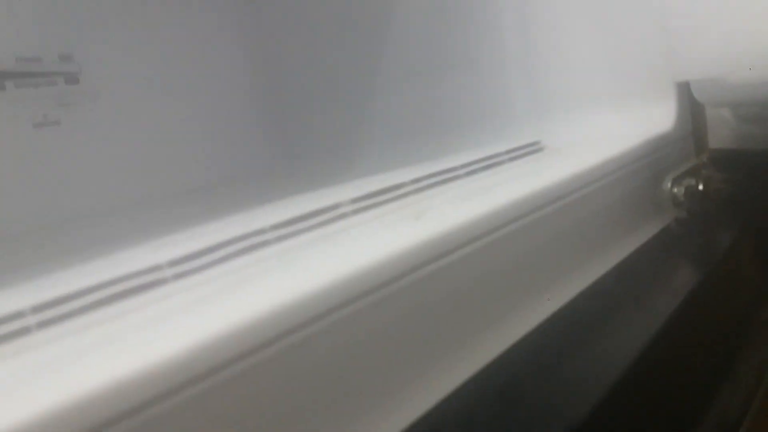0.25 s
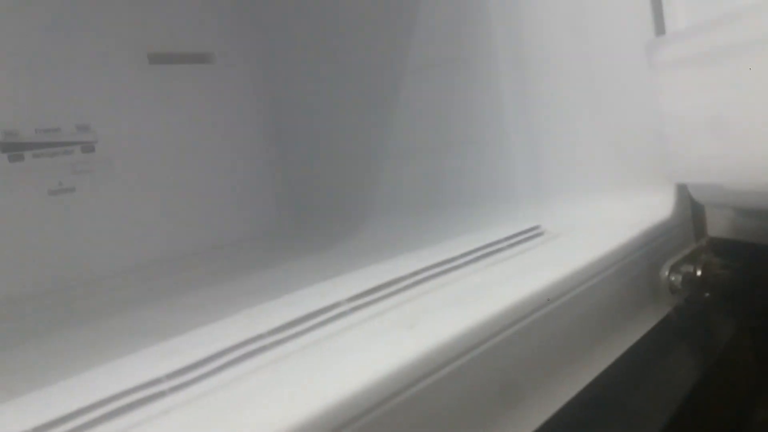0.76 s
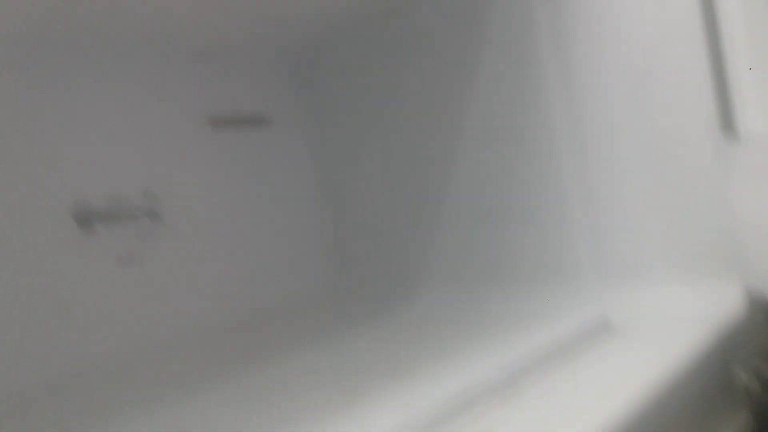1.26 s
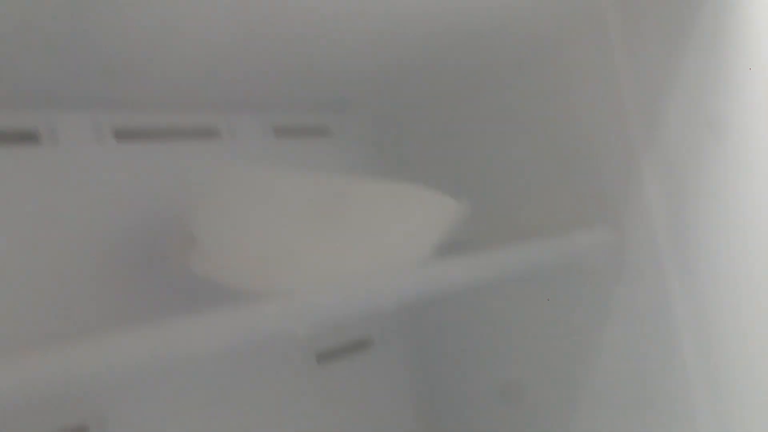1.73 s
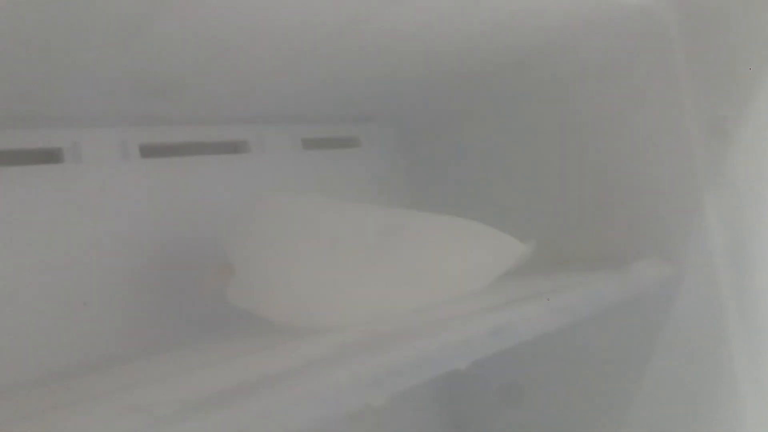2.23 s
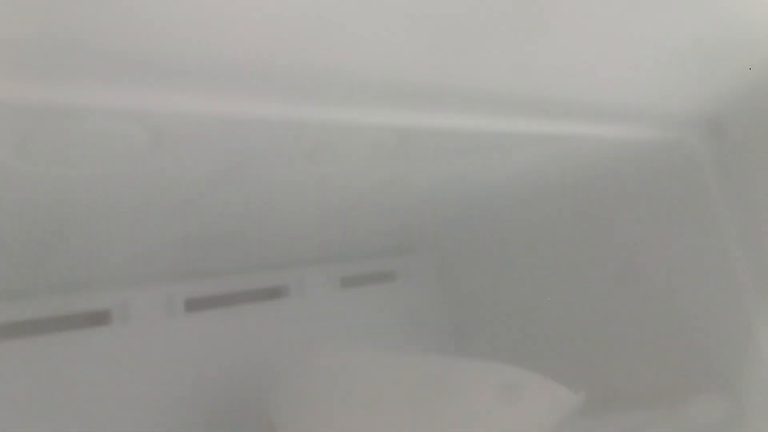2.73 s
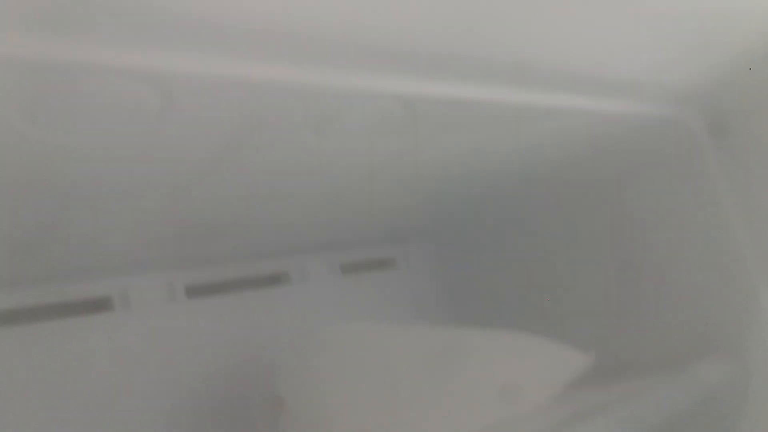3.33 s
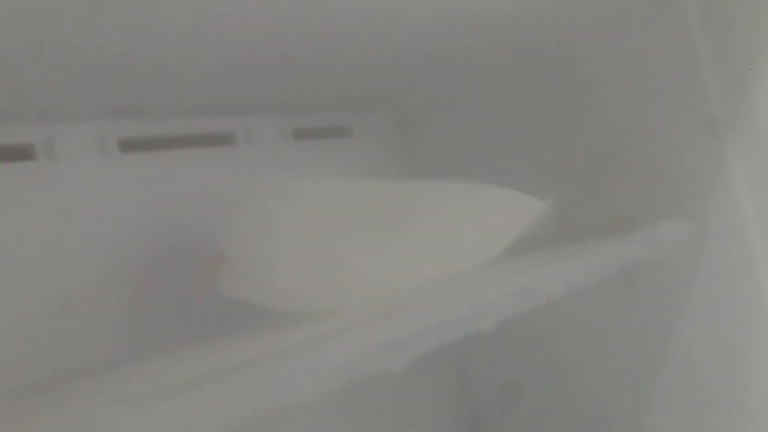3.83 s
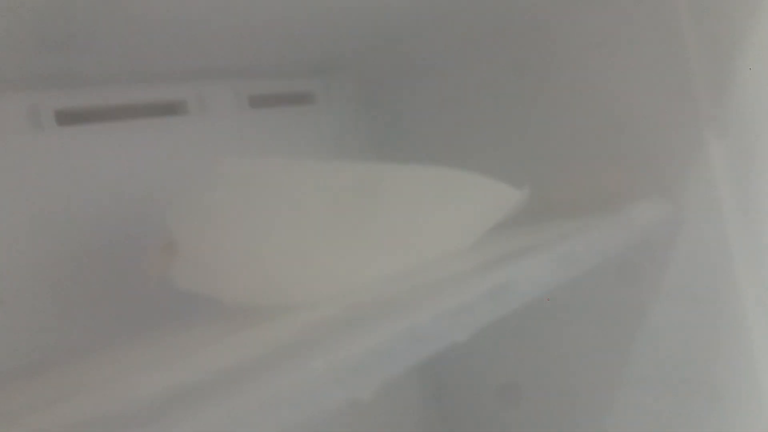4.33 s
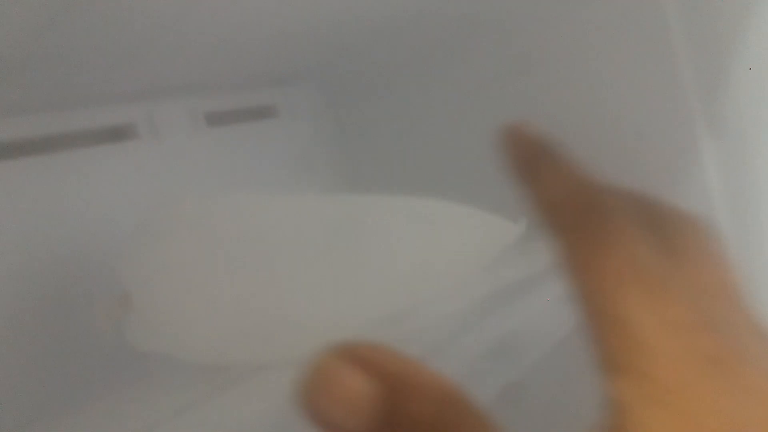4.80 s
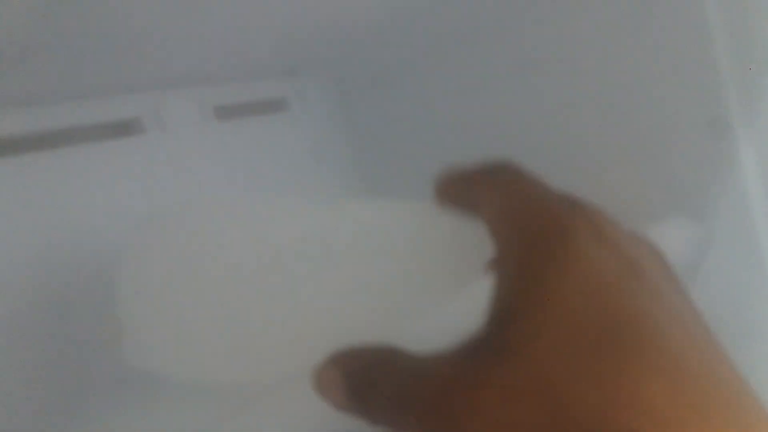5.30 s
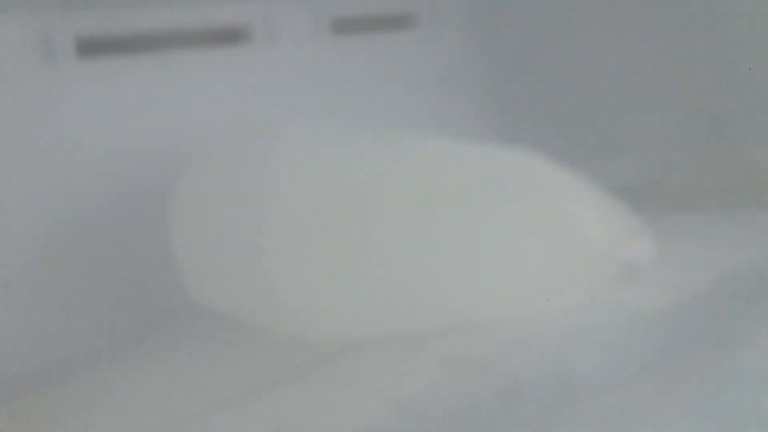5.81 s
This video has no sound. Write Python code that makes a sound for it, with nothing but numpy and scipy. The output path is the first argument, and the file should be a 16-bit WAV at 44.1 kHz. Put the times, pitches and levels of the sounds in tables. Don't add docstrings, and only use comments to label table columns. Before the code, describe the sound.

A steady fridge hum with airy rush and faint hiss, heard close from a moving hand-held microphone in a small hard-walled box. Fingers brush plastic quietly; one bright click with a small knock breaks in early. Rubbing grows scratchier midway, then a frozen plastic bag crackles and creaks as it is shoved, thudding hard against the shelf several times. Light ticks follow and the hum continues, its airy rumble growing stronger.

```python
import sys
import numpy as np
from scipy import signal
from scipy.fft import rfft, irfft, next_fast_len
from scipy.io import wavfile
from scipy.ndimage import uniform_filter1d

SR = 44100
rng = np.random.default_rng(int(sys.argv[2]) if len(sys.argv) > 2 else 0)


def bounce(signal):
    frames = np.transpose(np.atleast_2d(signal))
    limited = np.clip(frames, -1, 1)
    pcm = np.round(limited * 32767).astype(np.int16)
    wavfile.write(sys.argv[1], SR, pcm)


def amplitude_ratio(level_db):
    exponent = np.asarray(level_db, float) / 20
    return 10 ** exponent


N = 267113


def in_time(rows):
    s, *columns = np.transpose(rows)
    return [np.interp(np.arange(N) / SR, s, column) for column in columns]


def rms_one(x):
    return x / np.sqrt(np.mean(x ** 2) + 1e-20)


def coloured(spectrum):
    size = next_fast_len(N)
    hz = np.arange(size // 2 + 1) * SR / size + 1e-3
    at_hz, db = np.transpose(spectrum)
    gain = amplitude_ratio(np.interp(np.log(hz), np.log(at_hz), db, left=-120, right=-120))
    return rms_one(irfft(rfft(rng.standard_normal(size)) * gain, size)[:N])


def drift(rate_hz):
    r = np.exp(-80 * np.pi * rate_hz / SR)
    chance = rng.standard_normal(N // 40 + 2002)
    slow = signal.lfilter([1], [1, -2 * r, r * r], chance)[2000:]
    return np.interp(np.arange(N) / 40, np.arange(len(slow)), rms_one(slow - slow.mean()))


def band(x, low_hz, high_hz):
    return signal.sosfilt(signal.butter(3, [low_hz, high_hz], "band", fs=SR, output="sos"), x)


def ring(x, hz, t60_s):
    r, w = amplitude_ratio(-60 / (t60_s * SR)), 2 * np.pi * hz / SR
    return signal.lfilter([0, np.sin(w)], [1, -2 * r * np.cos(w), r * r], x + 1e-18)


def tone(hz, db, flutter_db):
    phase = 2 * np.pi * (np.cumsum(hz * np.ones(N)) / SR + rng.random())
    return np.sqrt(2) * amplitude_ratio(db + flutter_db * drift(4.3)) * np.sin(phase)


# order, level_db
EVEN_ORDERS = [(6, -55), (7, -61), (9, -56), (12, -59), (13, -71), (15, -68), (18, -73), (20, -69),
               (21, -73), (22, -69), (27, -73), (29, -77), (34, -74)]
# order, crest_level_db,
# door_angle_turns, phase_over_depth_turns, share_of_wall_nearness
STANDING_ORDERS = [(3, -35, 0.05, -0.04, 0.7), (4, -42.8, 0.04, 0.03, 0.9), (8, -45, 0.01, 0.13, 0.2),
                   (16, -57.5, 0.03, 0.07, 0.3), (24, -58.5, 0.24, -0.3, -1.7),
                   (28, -56.5, 0.155, 0.29, 0.6)]


def compressor(depth, near_db):
    shaft_hz = 49.212
    node_power = 0.01
    out = sum(tone(order * shaft_hz, db, flutter_db=0.0) for order, db in EVEN_ORDERS)
    for order, crest_db, angle, turns, share in STANDING_ORDERS:
        wave_power = np.cos(2 * np.pi * (angle + turns * depth)) ** 2
        db = crest_db + 10 * np.log10(wave_power + node_power) + share * near_db
        out = out + tone(order * shaft_hz, db, flutter_db=3.0 / order)
    return out


def fan(fan_db):
    return tone(69.36, -41.5 + fan_db, flutter_db=0.5)


# pitch_hz, level_db_per_hz
RUMBLE = [(20, -50), (42, -46), (52, -10), (64, -18), (82, -25), (100, -16), (118, 1), (137, -3), (147, 4),
          (158, -2.5), (175, -5.5), (215, -8), (240, -26.5), (300, -25)]
# pitch_hz, level_db_per_hz
RUSH = [(190, -24), (230, -8), (260, -1.5), (290, -3.5), (330, -4.5), (360, -4), (420, -7), (500, -9),
        (650, -13.5), (850, -16), (1000, -15), (1300, -21), (1600, -29), (2200, -53)]
# pitch_hz, level_db_per_hz
GAP = [(440, -30), (490, -5), (540, -6), (580, -5.5), (640, -37)]
# pitch_hz, level_db_per_hz
UPPER_RUSH = [(1100, -14), (1500, -1.5), (2100, -0.5), (2600, -7), (3500, -12), (4500, -38)]
# pitch_hz, level_db_per_hz
HISS = [(1650, -34), (2800, -4), (3010, -7), (3580, -3), (3880, -8), (4000, 1.5), (4690, -1.5), (6410, -2),
        (8450, -19), (15900, -20.5)]


def air(depth, near_db, rub_db):
    rumble = amplitude_ratio(-39 + 1.1 * near_db + 1.24 * drift(4.5)) * coloured(RUMBLE)

    rush_level = np.hypot(amplitude_ratio(-45.3 + 0.45 * near_db), amplitude_ratio(rub_db - 4.5))
    rush = rush_level * amplitude_ratio(0.72 * drift(10)) * coloured(RUSH)

    gap_wave = np.cos(2 * np.pi * 0.33 * depth) ** 2
    gap = gap_wave * amplitude_ratio(-52 + 0.3 * near_db) * coloured(GAP)

    upper_level = np.hypot(amplitude_ratio(-63 + 4 * depth + 0.9 * near_db), amplitude_ratio(rub_db - 13.5))
    upper = upper_level * amplitude_ratio(0.6 * drift(9)) * coloured(UPPER_RUSH)

    hiss = amplitude_ratio(-67 + 0.28 * drift(9.8)) * coloured(HISS)
    return rumble + rush + gap + upper + hiss


# pitch_hz, width_hz, level_db
WHISTLES = [(4080, 25, -83)]


def whistles():
    noise = rng.standard_normal(N)
    out = np.zeros(N)
    for hz, width_hz, db in WHISTLES:
        t60_s = 2.2 / width_hz
        narrow = ring(ring(noise, hz, t60_s), hz, t60_s)
        out += amplitude_ratio(db + 4.6 * drift(1.2)) * rms_one(narrow)
    return out


# peak_s, level_db, rise_s, fall_s, top_over_body_db
STROKES = [(0.071, -63.7, 0.12, 0.25, -22.0), (0.434, -63.2, 0.21, 0.46, -21.2),
           (0.946, -57.1, 0.02, 1.28, -19.6), (1.112, -54.2, 0.18, 0.06, -23.5),
           (1.289, -54.7, 0.16, 0.08, -28.4), (1.6, -57.4, 0.21, 0.07, -23.3),
           (1.838, -61.8, 0.29, 0.09, -30.0), (2.172, -53.8, 0.03, 1.23, -20.2),
           (2.497, -44.1, 0.14, 0.34, -17.0), (2.754, -53.4, 0.52, 0.15, -15.0),
           (3.288, -52.1, 0.04, 0.25, -20.4), (3.477, -49.9, 0.3, 0.2, -18.2),
           (3.723, -56.7, 0.18, 0.37, -19.9), (4.026, -52.2, 0.09, 0.67, -19.8),
           (4.235, -44.6, 0.04, 0.24, -17.0), (5.1, -45.2, 0.12, 0.09, -16.5),
           (5.263, -39.7, 0.16, 0.1, -17.5), (5.33, -36.8, 0.03, 0.23, -18.0),
           (5.501, -37.7, 0.09, 0.08, -14.0), (5.687, -56.3, 1.13, 0.02, -20.9),
           (5.88, -53.3, 0.7, 0.27, -17.0)]


def rubbing_db():
    t = np.arange(N) / SR
    grip_db, grip_top_db = -68, -27
    body, top = amplitude_ratio(grip_db) ** 2, amplitude_ratio(grip_db + grip_top_db) ** 2
    for s, db, rise_s, fall_s, top_db in STROKES:
        bell = np.maximum((s - t) / rise_s, (t - s) / fall_s) ** 2
        power = amplitude_ratio(db - 20 * bell) ** 2
        body = body + power
        top = top + amplitude_ratio(top_db) ** 2 * power
    return 10 * np.log10(body), 10 * np.log10(top / body)


# pitch_hz, level_db_per_hz
RUSTLE_COLOUR = [(710, -31), (1200, -7), (1310, -5), (1350, -8.5), (1460, -10), (2250, -10), (2430, -9),
                 (3740, -7), (4170, -6), (6580, 0), (10300, -21.5), (15200, -31.5), (16000, -35)]
# start_s, end_s, snaps_per_s
CRINKLE = (5.03, 5.56, 350)


def rustle(level_db, top_db):
    noise = coloured(RUSTLE_COLOUR) * amplitude_ratio(1.05 * drift(25) + 0.7 * drift(150))
    body = band(noise, 900, 8500)
    top = rms_one(band(noise, 10580, 18500))

    start_s, end_s, snaps_per_s = CRINKLE
    start, end = round(start_s * SR), round(end_s * SR)
    size = end - start
    strength_db = 4.5 * np.minimum(rng.exponential(1, size), 3)
    snaps = (rng.random(size) < snaps_per_s / SR) * amplitude_ratio(strength_db)

    pitches_hz = [2800, 3600, 4500, 5300, 5800, 6300, 6800, 7400, 8300, 9600, 11500, 13500]
    dealt = rng.integers(0, 12, size)
    colour_hz, colour_db = np.transpose(RUSTLE_COLOUR)
    loudness_db = np.interp(np.log(pitches_hz), np.log(colour_hz), colour_db)
    crinkle = np.zeros(size)
    for k, (hz, db) in enumerate(zip(pitches_hz, loudness_db)):
        crinkle += amplitude_ratio(0.85 * db) * ring(snaps * (dealt == k), hz, 31.0 / hz)

    body[start:end] = 0.58 * body[start:end] + 0.39 * rms_one(crinkle)
    top[start:end] *= 0.72 + 0.4 * rms_one(uniform_filter1d(snaps, size=130, origin=64))
    return amplitude_ratio(level_db + 1.36) * (body + amplitude_ratio(top_db + 3.5) * top)


# start_s, peak_db, tilt_db, ring_hz
TICKS = [(1.3683, -13.5, -0.5, 5900), (2.1799, -40, 9.0, 6250), (3.895, -24.5, -7.5, 5870),
         (4.126, -24, -7, 5730), (4.977, -32.5, -6.5, 4500), (5.01, -37, 9, 6860), (5.0637, -27, -7, 6140),
         (5.0827, -28, 2.5, 5500), (5.0919, -25.5, 5.5, 7140), (5.1273, -20.5, -0.5, 7250),
         (5.1544, -37, 3, 6410), (5.1696, -31.5, -6, 6400), (5.2114, -18.5, -3, 7340),
         (5.2214, -35, 4, 7010), (5.2387, -26, -1.5, 7000), (5.254, -24, 11, 7160), (5.2834, -32, 7, 5530),
         (5.3154, -27, 3, 5600), (5.3227, -22, 1.5, 5940), (5.4454, -28, -3, 6150),
         (5.475, -16, -0.6, 6200), (5.484, -18.5, -3, 5980), (5.5045, -24, 2.5, 6540),
         (5.5246, -26.5, -11, 5300), (5.6431, -41.5, 8, 5860), (5.793, -25.5, -1.5, 6960),
         (5.799, -22, 1.2, 5840), (5.779, -44, 15, 7300), (5.884, -37, 1.5, 5350),
         (5.9035, -37, -1.5, 5500)]


def ticks():
    noise = coloured(RUSTLE_COLOUR) * amplitude_ratio(1.2 * drift(400))
    bands_hz = [(700, 4720), (4000, 8260), (9200, 16000)]
    parts = [rms_one(band(noise, low_hz, high_hz)) for low_hz, high_hz in bands_hz]

    t = np.arange(SR // 7) / SR
    direct = amplitude_ratio(-60 * (t / 0.028) ** 1.46)
    tail = amplitude_ratio(-17 - 60 * t / 0.19)
    burst = (direct + tail) * np.minimum(t / 0.00078, 1)

    out = np.zeros(N)
    for s, db, tilt_db, hz in TICKS:
        i = round(s * SR)
        low, mid, top = (part[i:i + len(t)] for part in parts)
        mid = 0.76 * mid + 0.47 * rms_one(ring(mid, hz, 0.004))
        low, mid, top = (p / np.sqrt(np.average(p ** 2, weights=burst ** 2)) for p in (low, mid, top))
        mix = amplitude_ratio(-11 - tilt_db) * low + mid + amplitude_ratio(-13 + tilt_db) * top
        out[i:i + len(t)] += amplitude_ratio(db - 7.5) * burst * mix
    return out


# start_s, level_db, pitch_hz, length_s
CREAKS = [(5.216, -39.5, 3200, 0.021), (5.234, -34.5, 3200, 0.018), (5.474, -35, 2230, 0.032),
          (5.46, -41, 750, 0.05), (1.374, -32, 1360, 0.0074), (1.51, -43, 540, 0.074),
          (5.212, -40.5, 3100, 0.057), (5.525, -40, 800, 0.06), (5.325, -39.5, 710, 0.062),
          (5.797, -48, 2400, 0.017), (5.796, -46, 1250, 0.022), (4.977, -50, 3300, 0.014),
          (5.008, -53, 3000, 0.012), (5.515, -43, 1800, 0.03)]


def creaks():
    out, noise = np.zeros(N), rng.standard_normal(N)
    for s, db, hz, length_s in CREAKS:
        i, size = round(s * SR), round(length_s * SR)
        lead_in = 999
        rasp = rms_one(ring(noise[i - lead_in:i + size], hz, 17.0 / hz))[lead_in:]
        out[i:i + size] += amplitude_ratio(db) * np.hanning(size) * rasp
    return out


# start_s, peak_db, brightness_db, body_hz, body_t60_s
KNOCKS = [(1.374, -23.5, 4, 370, 0.12), (5.158, -23, 2, 441, 0.093), (5.327, -8.7, -3, 384, 0.049),
          (5.3325, -16, 3, 455, 0.073), (5.343, -19, -10, 373, .1), (5.355, -15, -6, 367, 0.11),
          (5.455, -20, -13, 354, 0.16), (5.513, -18, -15, 349, .1), (5.5155, -18, 3, 336, 0.082),
          (5.527, -21, 9, 355, 0.14), (5.536, -23, 4, 333, 0.046), (5.5429, -15, -4, 353, 0.044),
          (5.557, -18, -1.5, 349, 0.17), (5.57, -23, -2.5, 296, 0.089)]
# pitch_hz, level_db, t60_s
SHELF = [(310, -21, 0.027), (662, -13.5, 0.05), (830, -12.5, 0.043), (937, -13.5, 0.061), (1062, -17, .06),
         (1437, -15, 0.032), (1645, -12.5, 0.036), (2010, -8.5, 0.025)]


def knocks():
    out, t = np.zeros(N), np.arange(SR // 4) / SR
    blow = np.exp(-((t - 0.0004) / 0.00017) ** 2)
    blow = blow / blow.sum()
    scatter_db = rng.normal(0, 2.5, (len(KNOCKS), len(SHELF)))
    for (s, db, bright_db, body_hz, body_t60_s), own_db in zip(KNOCKS, scatter_db):
        sound = ring(blow, body_hz, body_t60_s)
        for (hz, level_db, t60_s), extra_db in zip(SHELF, own_db):
            sound = sound + amplitude_ratio(level_db + bright_db + extra_db) * ring(blow, hz, t60_s)
        out[round(s * SR):][:len(t)] += amplitude_ratio(db - 3.5) * sound
    return band(out, 96, 8900)


# start_s, end_s, pitch_hz, level_db
SQUEAK = (1.615, 1.685, 15200, -80)


def squeak():
    start_s, end_s, hz, db = SQUEAK
    t = np.arange(N) / SR
    fade = np.clip(np.minimum(t - start_s, end_s - t) / 0.008, 0, 1)
    return fade * tone(hz + 40 * drift(60), db, flutter_db=2.5)


# time_s, depth,
# wall_nearness_db, fan_nearness_db
MICROPHONE = [(0, 0.03, -2.5, -2.5), (0.3, 0.07, 0.8, -0.5), (0.8, 0.02, -0.5, 0), (1.25, 0.02, -1.5, 0.2),
              (1.6, 0.0, 1.5, 0.3), (2.0, 0.32, 2, -1.5), (2.45, 0.75, -1.2, -2.3), (3.0, 0.72, 1.2, -1.5),
              (3.65, 0.75, 4, -2.6), (3.85, 0.8, 1.5, -0.4), (4.15, 0.95, 3.2, 3.9), (4.6, 1.1, 3.6, 4.7),
              (4.9, 1.0, 2.6, 5), (5.35, 0.8, 2.6, 5.3), (5.75, 0.45, 4.6, 5.5), (6.06, 0.3, 7, 5.8)]


def scene():
    depth, near_db, fan_db = in_time(MICROPHONE)
    rub_db, top_db = rubbing_db()
    machine = compressor(depth, near_db) + fan(fan_db) + air(depth, near_db, rub_db) + whistles()
    handling = rustle(rub_db, top_db) + ticks() + creaks() + knocks() + squeak()
    return (machine + handling)[None]


def band_limit(x):
    return signal.sosfilt(signal.butter(12, 16450, fs=SR, output="sos"), x)


def record(dry):
    cutoff_hz, offset = 16050, -0.0007
    cut = signal.sosfilt(signal.cheby2(20, 50, cutoff_hz, fs=SR, output="sos"), dry)
    return band_limit(cut + offset)


dry = scene()
out = record(dry)
bounce(out)
```